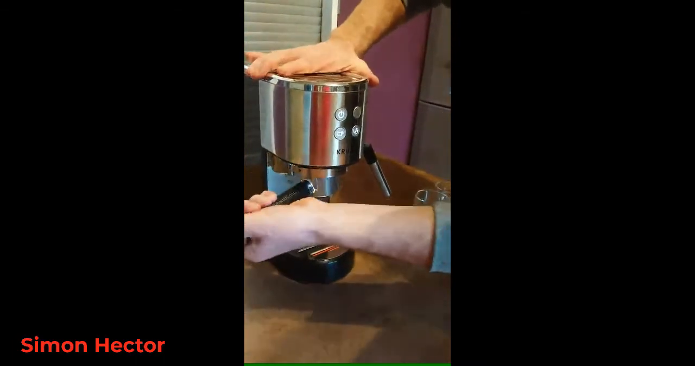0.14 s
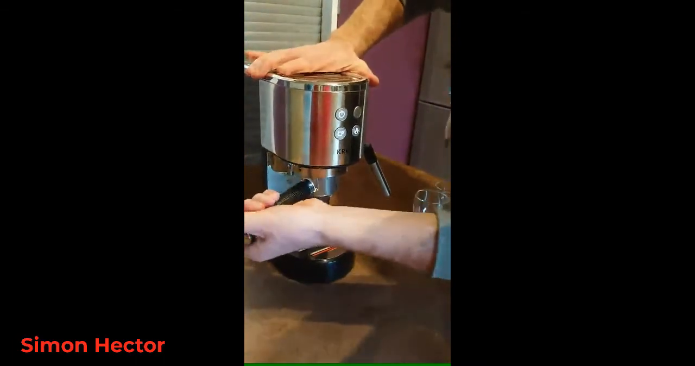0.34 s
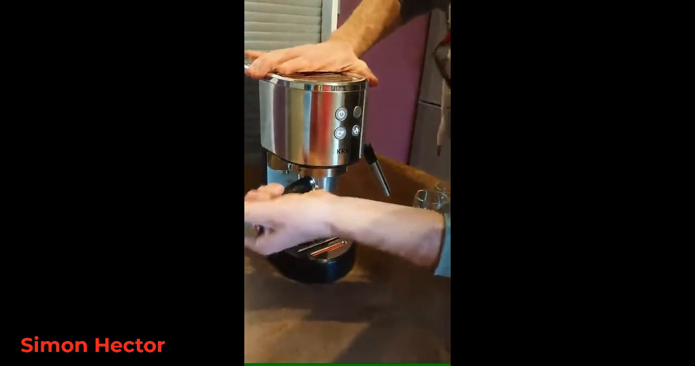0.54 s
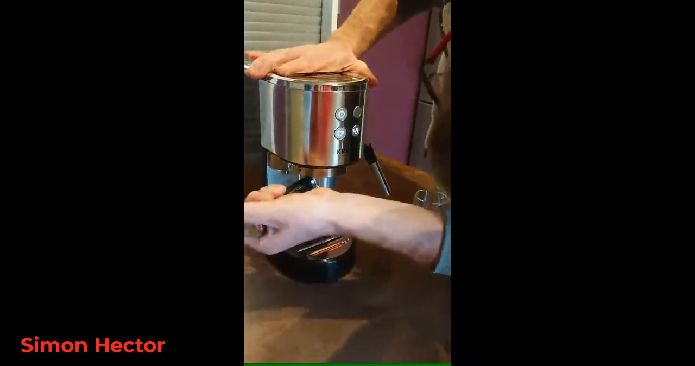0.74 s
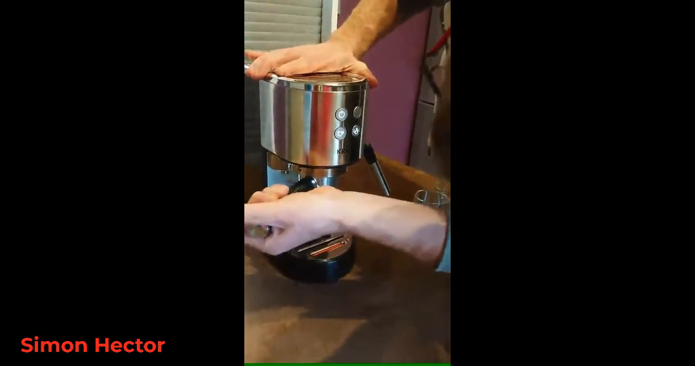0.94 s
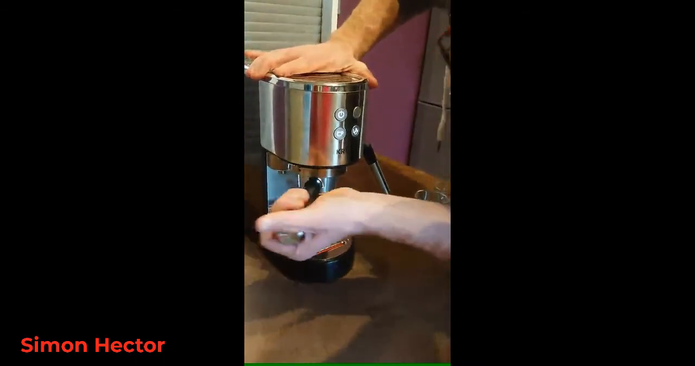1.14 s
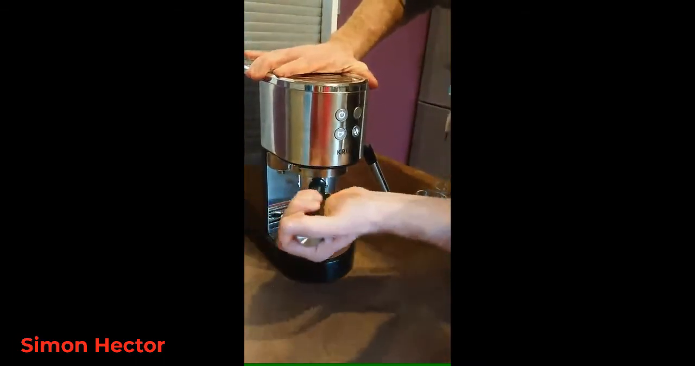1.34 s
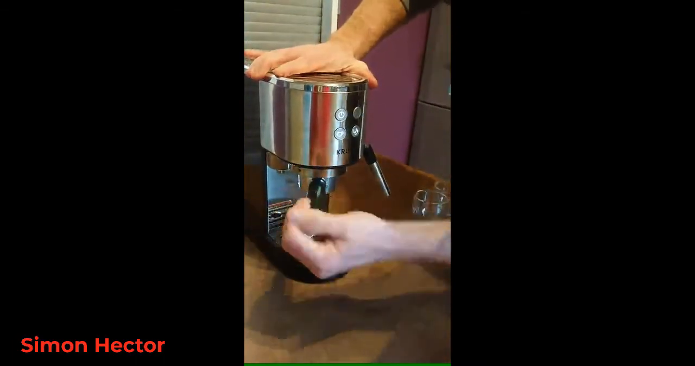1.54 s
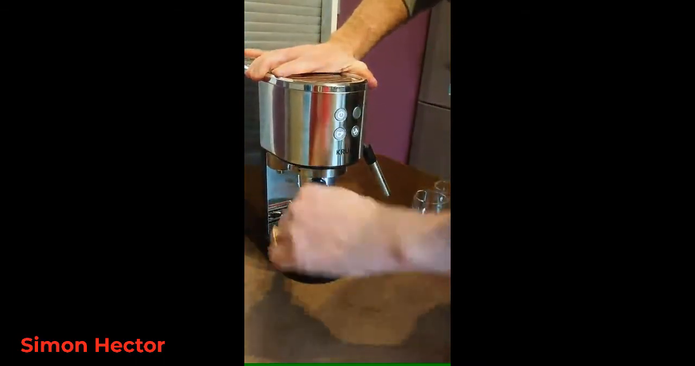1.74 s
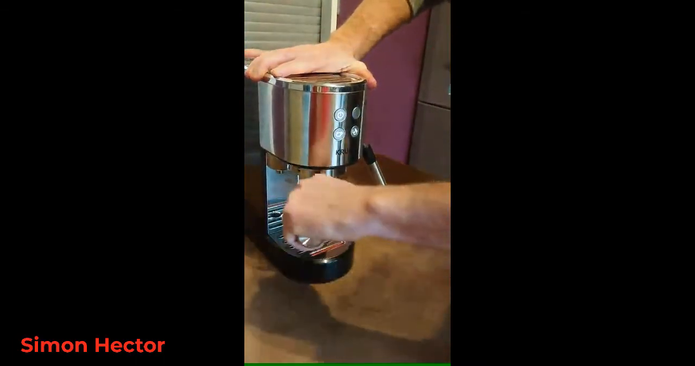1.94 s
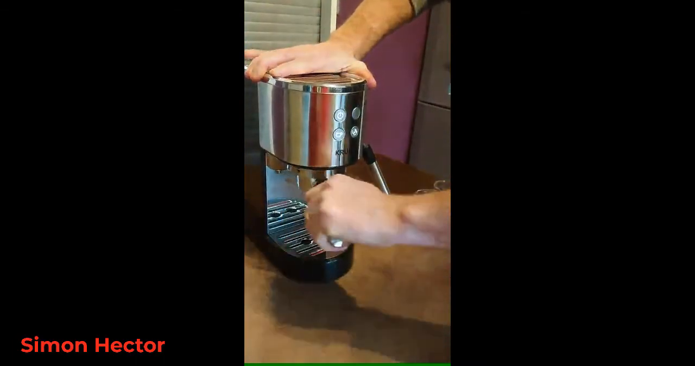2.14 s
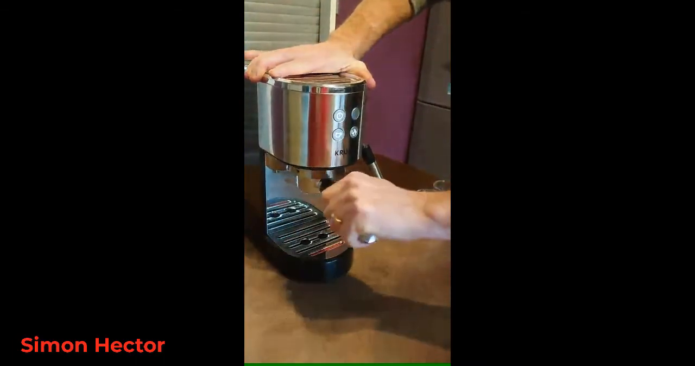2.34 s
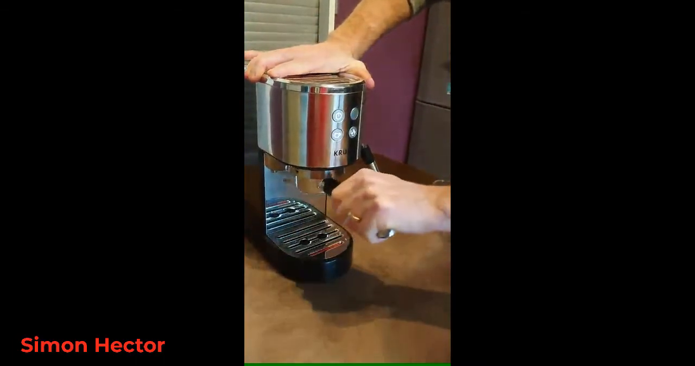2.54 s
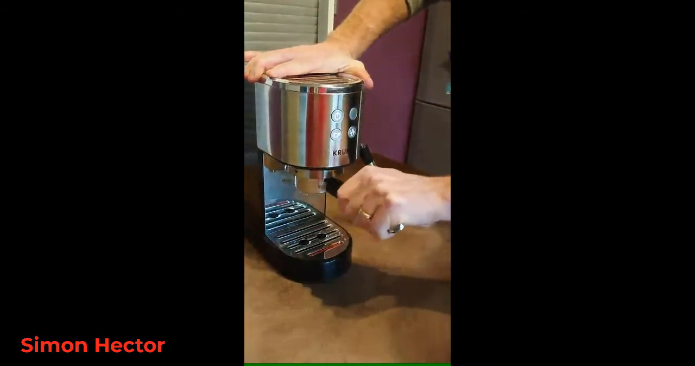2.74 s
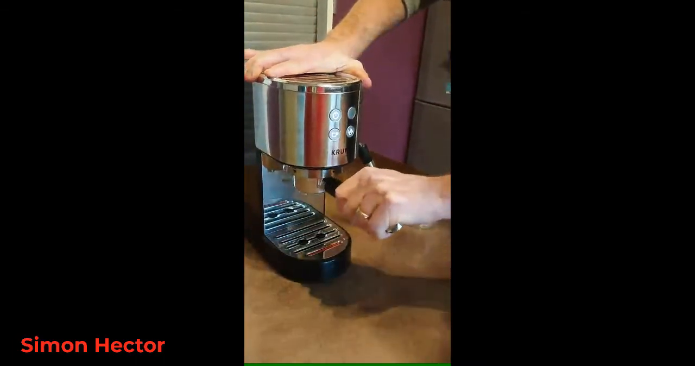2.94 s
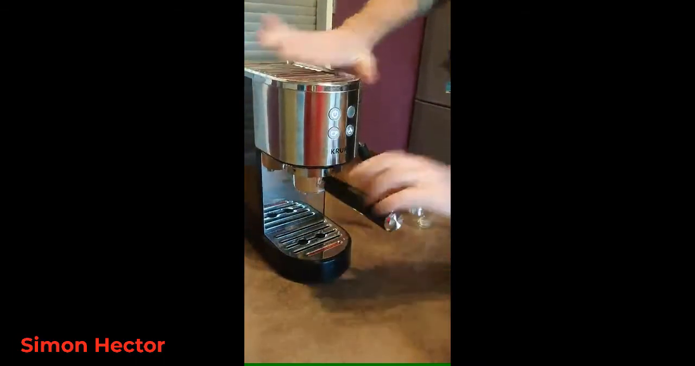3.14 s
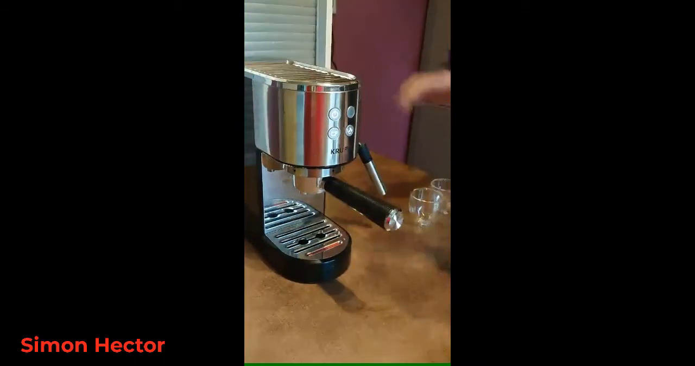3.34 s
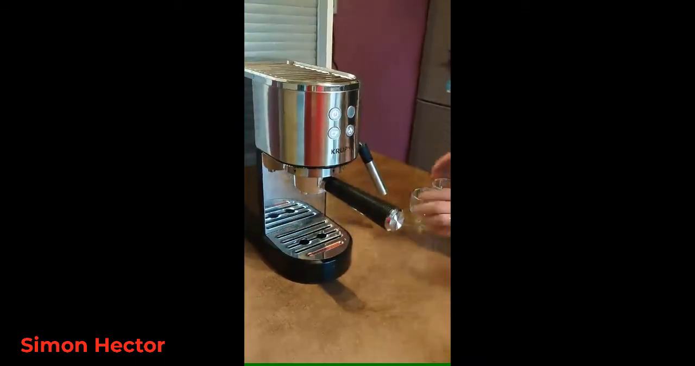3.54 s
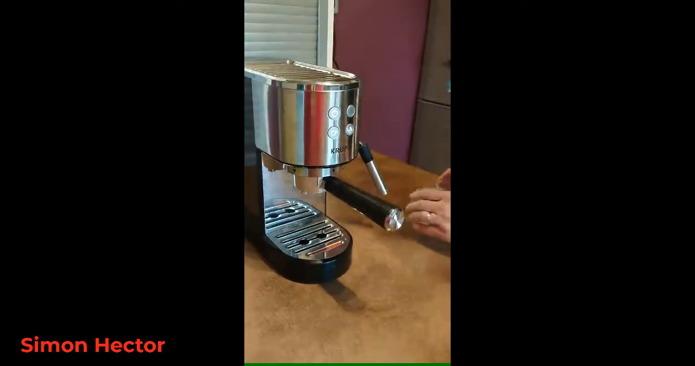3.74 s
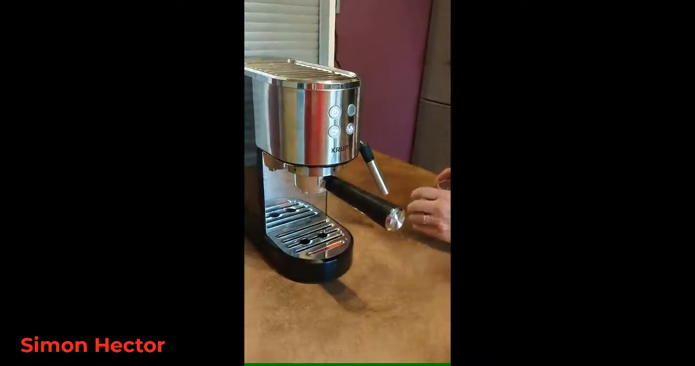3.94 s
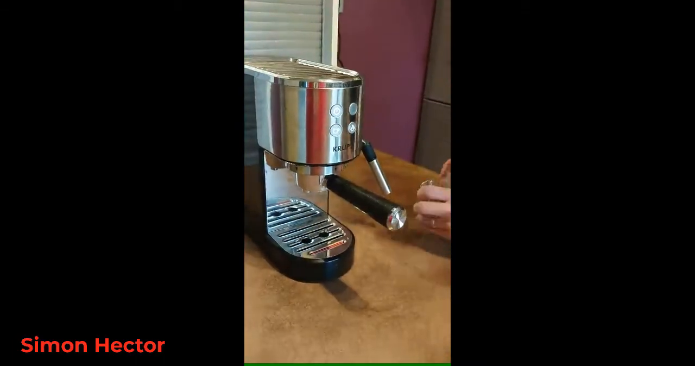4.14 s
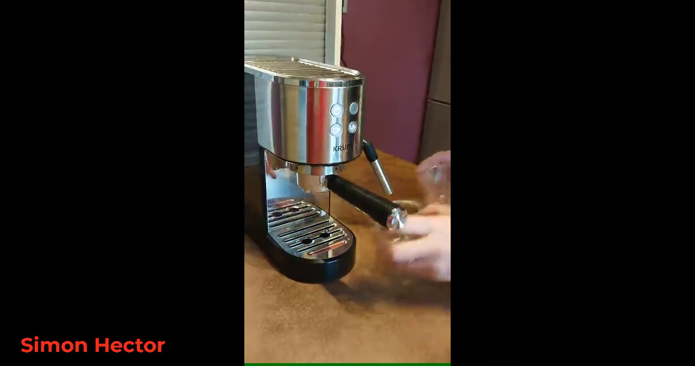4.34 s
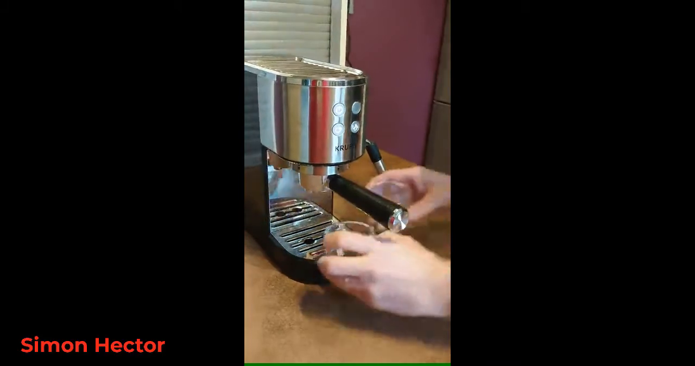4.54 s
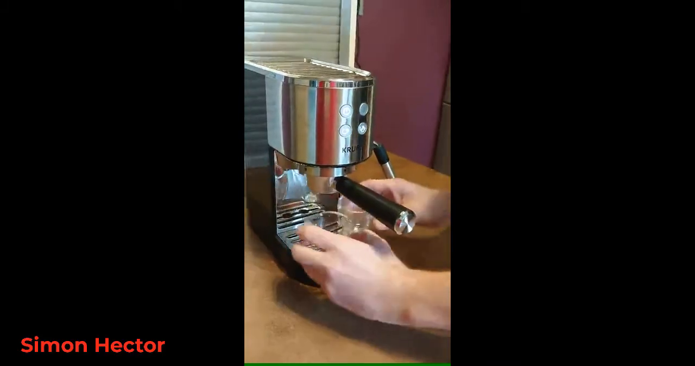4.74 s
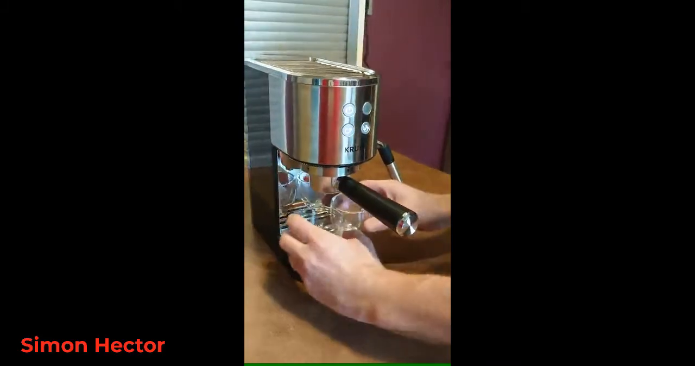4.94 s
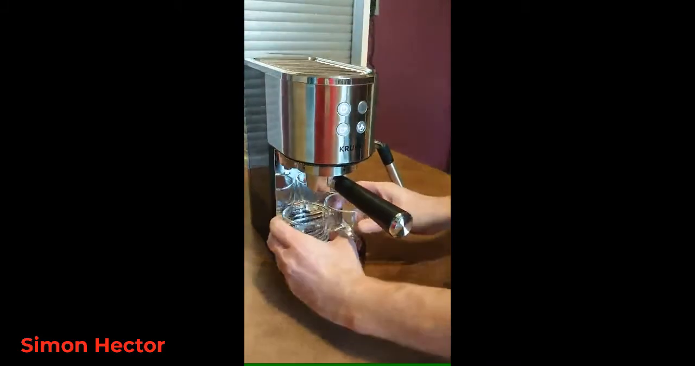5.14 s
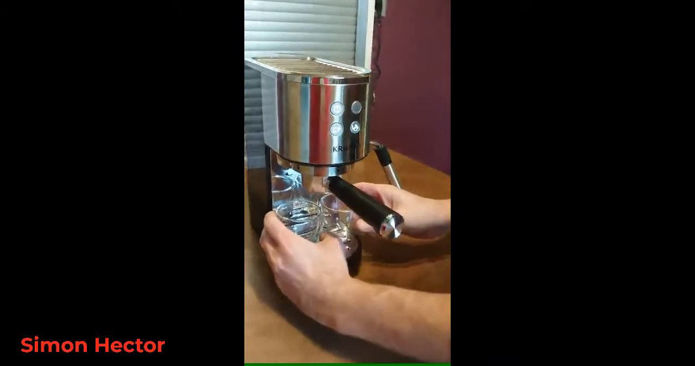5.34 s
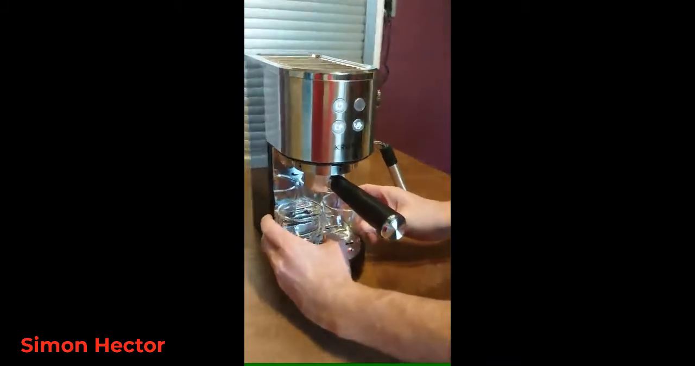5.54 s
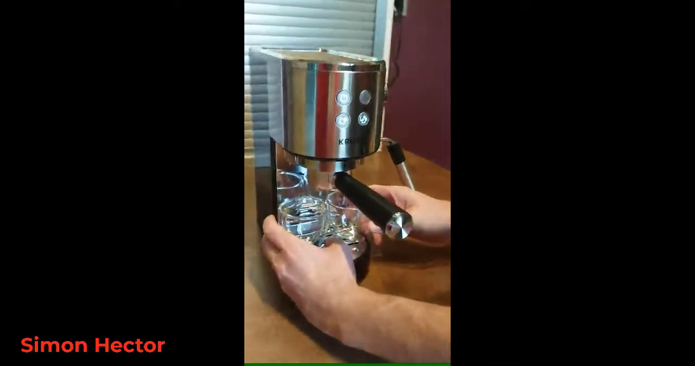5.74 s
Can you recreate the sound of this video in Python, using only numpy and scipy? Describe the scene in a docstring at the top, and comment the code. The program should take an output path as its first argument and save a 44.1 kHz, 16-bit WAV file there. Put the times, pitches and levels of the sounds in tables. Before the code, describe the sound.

Dull metallic knocks as a filter holder is twisted into an espresso machine, then glass cups clink and land with a clatter on its metal tray.

```python
"""A quiet kitchen: low room noise and a thin electrical whine behind an espresso machine.
A filter holder is worked into the machine with dull knocks, a rasp, straining rumble and faint creaks.
Two glass cups clink as they are lifted, land on the metal drip tray and rattle, scrape and squeak.
Blows are coloured noise bursts with ringing modes; rubbing is many tiny slips; squeaks are unsteady
harmonics, the first and loudest gliding upward; the whine is a set of wavering sines."""
import sys
import numpy as np
from scipy import signal
from scipy.fft import rfft, irfft
from scipy.io import wavfile
from scipy.ndimage import uniform_filter1d

SR = 44100
rng = np.random.default_rng(int(sys.argv[2]) if len(sys.argv) > 2 else 0)


def bounce(signal):
    """Save signal as a 16-bit WAV file at the path given by the first command-line argument."""
    frames = np.transpose(np.atleast_2d(signal))
    limited = np.clip(frames, -1, 1)
    pcm = np.round(limited * 32767).astype(np.int16)
    wavfile.write(sys.argv[1], SR, pcm)


N = 255780
EVENT_SAMPLES = 24576
HZ = np.fft.rfftfreq(EVENT_SAMPLES, 1 / SR)
AGE_S = np.arange(EVENT_SAMPLES) / SR
TIME_S = np.arange(N) / SR
BAND_EDGE_HZ = 15700

# steady room noise, spectrum shape: freq_hz, relative_db
FLOOR_SHAPE = [(25, -29), (70, -6.5), (115, -8), (144, -3), (175, -8.5), (260, -5.5), (450, -9.5),
               (640, -17), (1100, -21.5), (2700, -31), (3700, -30), (5400, -49), (10200, -45),
               (12500, -59.5)]
# electrical whine lines: freq_hz, level_db (before waver and pan)
WHINE_LINES = [(3289, -82), (3343, -89.5), (3736, -96.5), (3784, -97.5), (3883, -97.5), (6503, -93),
               (7020, -104)]
# stereo width: freq_hz, side_to_mid_db
STEREO_WIDTH = [(60, -12.5), (150, -14.5), (300, -12.5), (600, -4), (1200, -1), (15000, -0.5)]
# kitchen reverberation: freq_hz, t60_s
ROOM_DECAY = [(100, 0.43), (400, 0.48), (1200, 0.46), (4000, 0.56), (12000, 0.4)]

# hands and sleeves brushing: peak_s, level_db (dry, at the peak), length_s
BRUSH_STROKES = [(1.84, -73, 0.38), (2.22, -69, 0.5), (2.37, -75, 0.24), (3.37, -77.5, 0.2),
                 (3.515, -71, 0.33), (4.125, -61.5, 0.17)]
# machine straining on the counter at each pull on the holder: peak_s, level_db, length_s
STRAIN_STROKES = [(1.89, -64, 0.45), (2.26, -63, 0.38)]
# holder rasping on the rubber seal as it turns: peak_s, level_db, length_s
RASP_STROKES = [(1.06, -54, 0.07), (1.105, -66, 0.08)]
# glass pushed over the counter and the tray: peak_s, level_db, length_s
SLIDE_STROKES = [(4.043, -57, 0.14), (5.09, -51, 0.3), (5.255, -46.5, 0.12), (5.47, -52, 0.27),
                 (5.72, -64, 0.6)]
# rubbing spectrum shapes: freq_hz, relative_db
CLOTH_SHAPE = [(60, -4), (300, -1.5), (900, -3.5), (2200, -1.5), (4400, -5.5), (5800, -30.5),
               (11000, -19), (13000, -37)]
COUNTER_SHAPE = [(25, -12.5), (50, -5.5), (90, 1), (150, -9.5), (300, -22.5), (1000, -50), (5000, -78)]
RUBBER_SHAPE = [(80, -1), (300, 2.5), (650, -3.5), (1150, 1.5), (1900, -5.5), (2600, -8.5),
                (2950, -31), (6000, -47)]
GRIT_SHAPE = [(50, -12.5), (150, 6), (500, -3), (1000, 6), (2000, -5.5), (4500, -16), (5800, -37),
              (10500, -30.5), (15000, -46)]
# a stroke swells for this share of its length; its ends lie this far under its peak
SWELL_SHARE, STROKE_DROP_DB = 0.35, 21

# cup's foot squeaking on the tray: start_s, length_s, level_db, mid_pitch_hz, upward_glide_hz
SQUEAKS = [(5.241, 0.046, -37.5, 3285, 200), (5.32, 0.04, -63, 3310, 0), (5.42, 0.05, -60, 3170, 0),
           (5.54, 0.26, -69, 3175, 0)]
# cups against the tray: start_s, strength_db, thud_db, hardness_db
TAP_EVENTS = [(4.69, -2.5, 3, -12), (4.705, 3, -2, -15), (4.727, 8, -18, -25), (4.768, -6, -2, -18),
              (5.043, -2, -9, -1), (5.117, -4.5, -15, 0), (5.212, -6, 10.5, 6), (5.24, -11, 10, 12),
              (5.247, -11.5, 2, 11), (5.37, -15, -9, 3), (5.427, -12.5, -4, 1.5), (5.456, -7, -10, -2.5),
              (5.512, -16, 11, 2.5), (5.58, -17, 7.5, -4), (5.649, -20.5, -6, -0.5), (5.785, -19, -2, -2.5)]
# holder against the machine: start_s, strength_db, thud_db, hardness_db
KNOCK_EVENTS = [(0.003, -10, -4, -5), (0.179, -1.5, -21, -16), (0.197, -3.5, -11, -4), (0.438, -5, -12, -6),
                (0.452, 0.5, -11, -15), (0.491, -9, -15, -15), (0.627, -3.5, -16, -23),
                (0.654, -11.5, -1, -23), (0.694, -18, -3, -1), (0.78, -11.5, 3.5, -8),
                (0.802, -6.5, 10, -3), (0.886, 6, 2.5, -12), (0.937, -5, 2, -16), (0.985, -8.5, -1, -13),
                (1.013, -7.5, 4, -20), (1.036, -8, -5, -10), (1.457, -5, -4, -16), (1.49, -8, 3, -15),
                (1.52, -4.5, -2, -10), (1.553, -7, -3, -12), (1.735, -19.5, 7, 8), (1.898, -16, 3, 10),
                (1.999, -17, 1, -8), (2.226, -20, 13, 12), (2.238, -4, -3.5, -5.5), (2.258, -7.5, -7.5, 6),
                (2.27, -4.5, 4, -1), (3.094, -14, -11, -13), (3.441, -11.5, -6.5, -4),
                (3.453, -1.5, -3.5, -9.5), (3.49, -10.5, 0, -5)]
# faint quick creaks as the hands let go: start_s, strength_db
CREAK_EVENTS = [(3.335, -24), (3.36, -24), (3.383, -28), (3.4, -24)]

# colours of the blows, before strength and tone: freq_hz, colour_db
TAP_COLOUR = [(40, -17), (80, -1), (150, 1), (300, 0.5), (600, -6), (1000, -5), (2000, -5), (3500, -11.5),
              (4800, -15), (5700, -42.5), (7000, -35.5), (11000, -34), (15000, -38)]
LANDING_COLOUR = [(45, -13), (100, -2), (280, 8), (720, 10), (1080, 27.5), (1280, 15), (1900, 13),
                  (2500, 8), (3700, -4.5), (4900, -9.5), (5900, -33), (7600, -31.5), (11000, -34.5),
                  (15000, -52)]
CLINK_COLOUR = [(60, -31), (210, 4), (340, -4.5), (440, 6), (580, 6), (780, 11.5), (1050, 13.5), (1650, 14),
                (2500, -0.5), (4700, -15.5), (5600, -41), (8300, -43), (11000, -27), (15000, -53)]
KNOCK_COLOUR = [(40, -22), (80, -10.5), (150, -3), (265, 4.5), (350, -1.5), (450, 1.5), (640, -13),
                (850, -8.5), (1100, -15), (1600, -15), (2400, -22.5), (3200, -31), (5000, -46),
                (9000, -60.5)]
CREAK_COLOUR = [(100, -37), (1600, -21), (2100, -4), (2500, -4), (3100, -18), (6000, -45)]
# the cups' crowded upper modes: freq_hz, colour_db
SHIMMER_COLOUR = [(2000, -52), (3300, -10), (4700, -10), (5500, -40), (6250, -33), (6400, -16), (6600, -37),
                  (6920, -6.5), (7400, -44), (9400, -28.5), (10900, -15.5), (12400, -42), (13650, -14),
                  (14400, -55)]
# anchors of the contact tone: thud, pivot, clack, hardness, tick: freq_hz
TONE_ANCHORS_HZ = [130, 350, 1000, 2500, 9000]

# modes of cups, tray and machine housing: freq_hz, level_db (before strength), t60_s
GLASS_MODES = [(440, -44, .3), (712, -42, 0.45), (741, -44, 0.59), (829.6, -38, 0.36), (1051, -31.5, 0.23),
               (1142, -46.5, 0.19), (1238, -55.5, .4), (1405, -47, .19), (1480, -42, 0.21),
               (1520, -46, .24), (1602, -45, .19), (1862, -47, 0.36), (2270, -50, .19), (3090, -44, 0.38),
               (3140, -50, 0.43), (5860, -73, .15), (6390, -60, 0.33), (6900, -67, .3), (6900, -69, 0.41),
               (13140, -71, .28), (13630, -67, .27), (13770, -71, .27)]
TRAY_MODES = [(285.6, -36.5, 0.31), (503, -46, 0.3), (887, -50, 0.47), (1000, -43.5, 0.34),
              (1060, -36, .18), (1137, -39, 0.21), (1474, -46, 0.37), (1701, -42, 0.37), (1810, -47, 0.42),
              (1970, -41, 0.19), (2530, -41.5, 0.29), (2580, -42, .2), (3590, -46, .19)]
HOUSING_MODES = [(143.6, -63.5, .2), (270.7, -47.5, 0.22), (443, -57, 0.23), (737, -69.5, .2),
                 (832, -64.5, .18)]

# the holder tightens in its slot: begin_s, end_s
TIGHTENING_S = (0.85, 1.55)
# loose_db, tight_db: tight clacks more, and the housing rings less
CLACK_DB, HOUSING_DB = (-2.2, 4.5), (2.2, -7.5)
# a tap's clack at zero hardness; then clack and tick per dB of hardness
TAP_CLACK_DB, CLACK_PER_DB, TICK_PER_DB = 6, 0.52, 1.45


def amp(db):
    """Decibels to gain."""
    return 10 ** (np.asarray(db) / 20)


def unit(x):
    """Scales to an rms of one."""
    return x / np.sqrt(np.mean(x ** 2) + 1e-20)


def read(points, hz):
    """Interpolates a curve linearly over log frequency."""
    point_hz, value = np.transpose(points)
    return np.interp(np.log(hz + 1), np.log(point_hz), value)


def add(mix, start_s, sound):
    """Mixes a stereo sound in at start_s, cut at the end of the mix."""
    part = mix[:, round(start_s * SR):][:, :sound.shape[1]]
    part += sound[:, :part.shape[1]]


def pan(left_db):
    """Channel gains for a source off centre; left_db is left over right."""
    return amp(np.array([[1], [-1]]) * left_db / 2)


def spread(pair):
    """Two unrelated signals become left and right: alike in the bass, apart in the treble."""
    size = pair.shape[1]
    mid, side = rfft(pair)
    width = amp(read(STEREO_WIDTH, np.fft.rfftfreq(size, 1 / SR)))
    left_right = np.array([mid + width * side, mid - width * side])
    return irfft(left_right / np.sqrt(1 + width ** 2), size)


def tinted(pair, shape):
    """Full-length stereo signal filtered to a spectrum shape, at an rms of one."""
    gain = amp(read(shape, np.fft.rfftfreq(N, 1 / SR)))
    return unit(irfft(rfft(spread(pair)) * gain, N))


def room_tail():
    """Diffuse reflections of unit energy, each band dying at its own speed."""
    noise = spread(rng.standard_normal((2, EVENT_SAMPLES)))
    hz, time_s, bands = signal.stft(noise, SR, nperseg=256)
    decay = amp(-60 * time_s / read(ROOM_DECAY, hz)[:, None])
    tail = signal.istft(bands * decay, SR, nperseg=256)[1][:, :EVENT_SAMPLES]
    onset = 1 - np.exp(-(AGE_S / 0.01) ** 2)
    return unit(tail * onset) / np.sqrt(EVENT_SAMPLES)


def in_room(x, wet_db):
    """Adds the kitchen's reflections by convolution."""
    wet = signal.fftconvolve(x, room_tail(), axes=1)[:, :x.shape[1]]
    return x + amp(wet_db) * wet


def blow(colour_db, t60_s, wet_db, crack_db, rise_s=0.00054):
    """A sharp contact, a crowd of quickly damped modes and their room tail, given a causal colour."""
    burst = spread(rng.standard_normal((2, EVENT_SAMPLES)))
    burst = burst * amp(-60 * AGE_S / max(t60_s, .005)) * (1 - np.exp(-AGE_S / rise_s))
    raw = unit(burst) / np.sqrt(EVENT_SAMPLES) + amp(wet_db) * room_tail()
    spectrum = rfft(raw) + amp(crack_db)  # flat spectrum = one click at the start
    # level the energy in bands of about a third of an octave (wider in the bass), then colour
    bins = np.arange(len(HZ))
    total = np.cumsum(np.mean(abs(spectrum) ** 2, 0))
    low = np.maximum(bins - bins // 9 - 25, 0)
    high = np.minimum(bins + bins // 9 + 25, bins[-1])
    band_rms = np.sqrt((total[high] - total[low]) / (high - low))
    log_gain = np.log(amp(colour_db) / band_rms)
    # minimum phase, so that nothing sounds before the contact
    causal = np.exp(np.conj(signal.hilbert(np.r_[log_gain, log_gain[-2:0:-1]])))
    return irfft(spectrum * causal[:len(HZ)])


def ring(modes, build_s):
    """Long-lived modes as decaying sines; reflections build them up and set each channel's phase."""
    hz, level_db, t60_s = np.transpose(modes)[:, :, None]
    apart_rad = amp(read(STEREO_WIDTH, hz)) * rng.uniform(-1.52, 1.66, (2, len(modes), 1))
    phase_rad = 2 * np.pi * (hz * AGE_S + rng.random(hz.shape)) + apart_rad
    partials = amp(level_db - 60 * AGE_S / t60_s) * np.sin(phase_rad)
    return partials.sum(1) * (1 - np.exp(-AGE_S / build_s))


def tone(strength_db, thud_db, *upper_db):
    """How hard and how sharp a contact is, in dB over frequency."""
    shape = [thud_db, 0, *upper_db]
    return strength_db + read(list(zip(TONE_ANCHORS_HZ, shape)), HZ)


def strokes(rows):
    """Gain of rubbing strokes: each swells to its peak and eases off."""
    gain = np.zeros(N)
    for peak_s, level_db, length_s in rows:
        before, after = (peak_s - TIME_S) / SWELL_SHARE, (TIME_S - peak_s) / (1 - SWELL_SHARE)
        away = np.maximum(before, after) / length_s
        gain = np.hypot(gain, amp(level_db - STROKE_DROP_DB * away))
    return gain


def friction(rows, shape, slips_per_s, uneven_db, wet_db):
    """Many tiny slips of uneven size under each stroke."""
    size = amp(uneven_db * np.minimum(rng.exponential(1, N), 4))
    size = size * (rng.random(N) < slips_per_s / SR)
    slips = tinted(size * rng.standard_normal((2, N)), shape)
    return in_room(slips * strokes(rows), wet_db)


def room_noise(level_db=-67, left_db=2):
    """Low steady room noise: shaped random noise."""
    return amp(level_db) * tinted(rng.standard_normal((2, N)), FLOOR_SHAPE) * pan(left_db)


def electrical_whine(waver=0.13, sideband_db=-99, mains_hz=49.6, left_db=4):
    """Thin whine: sines wavering in level and phase, with faint sidebands spaced at the mains rate."""
    out, knots_s = np.zeros((2, N)), np.linspace(0, N / SR, 120)
    sidebands = [(WHINE_LINES[0][0] + k * mains_hz, sideband_db) for k in (-4, -3, -2, -1, 2, 3, 5, 6)]
    for hz, level_db in [*WHINE_LINES, *sidebands]:
        knots = rng.standard_normal(len(knots_s)) + 1j * rng.standard_normal(len(knots_s))
        drift = np.interp(TIME_S, knots_s, knots)
        carrier = np.exp(2j * np.pi * (hz * TIME_S + rng.random()))
        line = np.sqrt(2) * amp(level_db) * (1 + waver * drift) * carrier
        out += np.array([line.real, line.imag])  # channels a quarter cycle apart
    return out * pan(left_db)


def hands():
    """Hands and sleeves brush: dense, fine slips of cloth."""
    return friction(BRUSH_STROKES, CLOTH_SHAPE, slips_per_s=5000, uneven_db=2, wet_db=-4)


def strain():
    """The machine strains on the counter at each pull: sparse slips, mostly bass."""
    return friction(STRAIN_STROKES, COUNTER_SHAPE, slips_per_s=400, uneven_db=1.5, wet_db=-9)


def seal_rasp():
    """The turning holder rasps on the rubber seal: coarse slips."""
    return friction(RASP_STROKES, RUBBER_SHAPE, slips_per_s=1000, uneven_db=1.5, wet_db=-10)


def sliding():
    """Glass is pushed over the counter and the tray: gritty slips."""
    return friction(SLIDE_STROKES, GRIT_SHAPE, slips_per_s=2500, uneven_db=1.5, wet_db=-5)


def squeak(jitter=0.026, harmonics_db=(0, -26, -40, -38), left_db=3):
    """Glass sticks and slips on metal: unsteady harmonics swell and fade; the first squeak glides up."""
    out = np.zeros((2, N))
    for start_s, length_s, level_db, mid_hz, glide_hz in SQUEAKS:
        progress = np.minimum(AGE_S / length_s, 1)
        wobble = unit(uniform_filter1d(rng.standard_normal(EVENT_SAMPLES), size=55))
        pitch_hz = (mid_hz + glide_hz * (progress - .5)) * (1 + jitter * wobble)
        phase_rad = 2 * np.pi * np.cumsum(pitch_hz) / SR
        partials = sum(amp(db) * np.sin((k + 1) * phase_rad) for k, db in enumerate(harmonics_db))
        swell = np.sin(np.pi * progress) ** 2
        add(out, start_s, partials * amp(level_db) * swell * pan(left_db))
    return in_room(out, wet_db=-8.5)


def taps(t60_s=0.057, wet_db=-4, crack_db=-7.5, soft_rise_s=.006, glass_db=-25, left_db=1.2):
    """Lighter bumps on the tray: dull ones start softly, sharp ones crack and wake the glass a little."""
    out, glass = np.zeros((2, N)), ring(GLASS_MODES, build_s=0.0044)
    for start_s, strength_db, thud_db, hardness_db in TAP_EVENTS:
        clack_db = TAP_CLACK_DB + CLACK_PER_DB * hardness_db
        tick_db = TICK_PER_DB * hardness_db
        dull = np.clip(-tick_db / 20, .1, 1)
        colour_db = read(TAP_COLOUR, HZ) + tone(strength_db, thud_db, clack_db, hardness_db, tick_db)
        tap = blow(colour_db, t60_s, wet_db, crack_db - 16 * dull, rise_s=soft_rise_s * dull)
        add(out, start_s, tap + amp(glass_db + strength_db + hardness_db) * glass)
    return out * pan(left_db)


def landing(start_s=4.993, left_db=4.0, direct_s=0.032):
    """A cup lands hard on the tray's metal grid, to the left; its reflections come from all round."""
    out = np.zeros((2, N))
    hit = blow(read(LANDING_COLOUR, HZ), t60_s=0.057, wet_db=-7.5, crack_db=-13.5, rise_s=0.0012)
    hit = hit + ring(TRAY_MODES, build_s=0.0053)
    add(out, start_s, hit * pan(left_db * np.exp(-AGE_S / direct_s)))  # pan relaxes to centre
    return out


def clink(start_s=4.128, left_db=-0.6):
    """The cups strike each other as they are lifted, and the glass rings."""
    out = np.zeros((2, N))
    strike = blow(read(CLINK_COLOUR, HZ), t60_s=0.12, wet_db=-5, crack_db=-9, rise_s=0.00033)
    shimmer = blow(read(SHIMMER_COLOUR, HZ), t60_s=0.72, wet_db=7, crack_db=-20, rise_s=.004)
    glass = in_room(ring(GLASS_MODES, build_s=0.005), wet_db=-7)
    add(out, start_s, strike + shimmer + glass)
    return out * pan(left_db)


def creaks():
    """Faint quick creaks as the hands let go: very short coloured blows."""
    out = np.zeros((2, N))
    for start_s, strength_db in CREAK_EVENTS:
        add(out, start_s, blow(read(CREAK_COLOUR, HZ) + strength_db, t60_s=.016, wet_db=-9, crack_db=-6))
    return out


def knocks():
    """Lugs knock in their slot; as the holder tightens, the clack grows and the housing rings less."""
    out = np.zeros((2, N))
    for start_s, strength_db, thud_db, hardness_db in KNOCK_EVENTS:
        clack_db = np.interp(start_s, TIGHTENING_S, CLACK_DB) + CLACK_PER_DB * hardness_db
        housing_db = np.interp(start_s, TIGHTENING_S, HOUSING_DB)
        colour_db = read(KNOCK_COLOUR, HZ) + tone(strength_db, thud_db, clack_db, hardness_db)
        knock = blow(colour_db, t60_s=0.063, wet_db=-4, crack_db=-7)
        housing = amp(strength_db + housing_db) * ring(HOUSING_MODES, build_s=0.0022)
        add(out, start_s, knock + housing)
    return out * 1.0


def holder(left_db=0.3):
    """The filter holder in its slot: knocks, with a few faint creaks among the late ones, nearly central."""
    return (knocks() + creaks()) * pan(left_db)


def scene():
    """Sums the kitchen's background, the cups and the holder."""
    background = room_noise() + electrical_whine()
    rubbing = hands() + strain() + seal_rasp() + sliding()
    cups = squeak() + taps() + landing() + clink()
    return background + rubbing + cups + holder()


def record(dry):
    """The recorder's band limit: a linear-phase low-pass."""
    lowpass = signal.firwin(511, BAND_EDGE_HZ, window=("kaiser", 9), fs=SR)
    return signal.oaconvolve(dry, lowpass[None], "same")


dry = scene()
out = record(dry)
bounce(out)
```